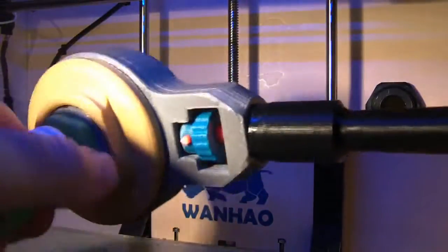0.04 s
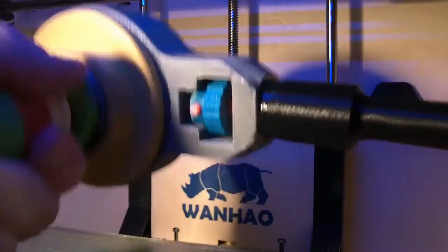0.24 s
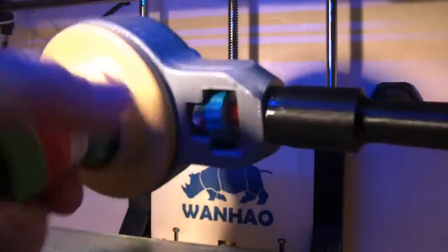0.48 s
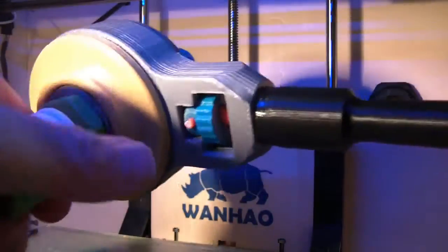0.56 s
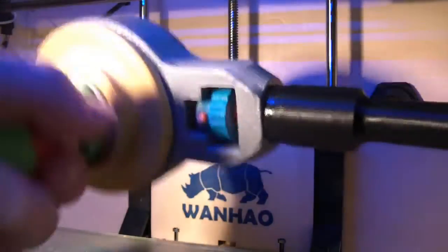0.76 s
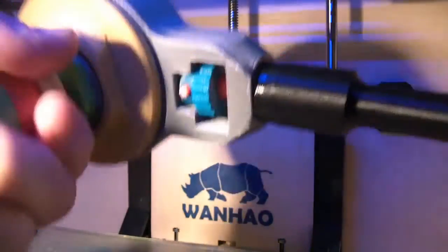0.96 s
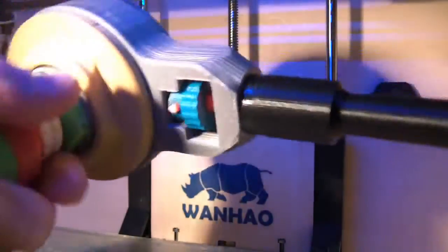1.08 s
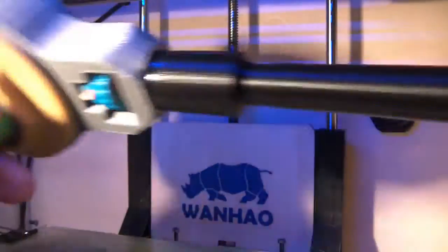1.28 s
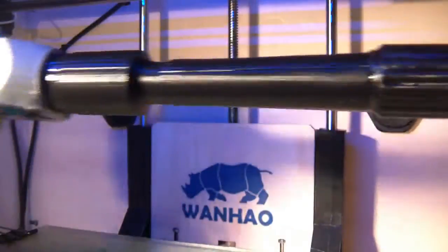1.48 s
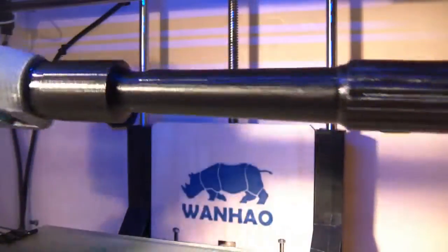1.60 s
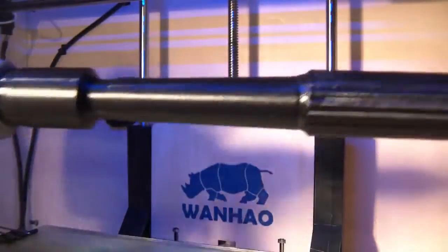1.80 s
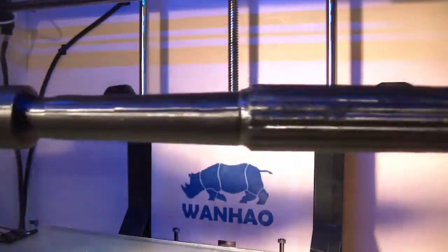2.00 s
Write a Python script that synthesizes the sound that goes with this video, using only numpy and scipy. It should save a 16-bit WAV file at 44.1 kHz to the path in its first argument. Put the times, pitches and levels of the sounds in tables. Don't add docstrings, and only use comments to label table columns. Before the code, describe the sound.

A plastic ratchet wrench clacks loudly in two short bursts over steady whining fan hum

```python
import sys
import numpy as np
from scipy import signal
from scipy.io import wavfile
from scipy.ndimage import uniform_filter1d

SR = 44100
rng = np.random.default_rng(int(sys.argv[2]) if len(sys.argv) > 2 else 0)


def unload_wav(signal):
    wavfile.write(
        sys.argv[1],
        SR,
        np.round(np.clip(np.atleast_2d(signal).T, -1, 1) * 32767).astype(np.int16),
    )


def convert_level_to_amplitude(level_db):
    exponent = np.asarray(level_db, float) / 20
    return 10 ** exponent


N = 90404


def evened(x):
    return x / np.sqrt(np.mean(x ** 2) + 1e-20)


def read(points, hz):
    f, value = np.transpose(points)
    return np.interp(np.log(hz + 1), np.log(f + 1), value)


# (frequency [Hz], level [dB])
AIR_COLOUR = [(20, -18), (120, -17.5), (190, -20.5), (500, -9.5), (1200, -15.5), (5000, -12.5),
              (8000, -27.5), (14000, -27)]
# (frequency [Hz], width [Hz], level [dB])
BOX_RESONANCES = [(310, 20, 7.5), (787, 33, -2), (2200, 97, -5.5), (2930, 760, 2.5), (4170, 200, 5),
                  (12400, 320, -12.5), (15200, 1100, -25)]
# (frequency [Hz], likeness [0 to 1])
LIKENESS = [(40, 0.69), (180, 0.73), (550, 0.89), (1650, 1), (4970, 0.69), (15000, 0.1)]
# (frequency [Hz], left minus right [dB])
LEAN_LEFT = [(60, 1), (240, -1), (950, -1), (3770, -1.5), (15000, -1)]


def air():
    level_db, patch_db = -31, 0.86
    frames, hz = N // 256 + 5, np.fft.rfftfreq(1024, 1 / SR)
    a, b, c, d, patches = rng.standard_normal((frames, 513, 5)).T
    patches = uniform_filter1d(patches, size=10, axis=0)
    patches = evened(uniform_filter1d(patches, size=10, axis=1))
    bumps = sum(db * np.exp(-((hz - f) / width) ** 2) for f, width, db in BOX_RESONANCES)
    colour = read(AIR_COLOUR, hz) + bumps
    same = np.clip(read(LIKENESS, hz), -1, 1)[:, None]
    left = a + 1j * b
    right = same * left + np.sqrt(1 - same ** 2) * (c + 1j * d)
    lean = read(LEAN_LEFT, hz) * np.array([[.5], [-.5]])
    spectrum = np.array([left, right]) * convert_level_to_amplitude((colour + lean)[:, :, None] + patch_db * patches)
    hiss = signal.istft(spectrum, nperseg=1024, noverlap=768)[1][:, :N]
    return convert_level_to_amplitude(level_db) * evened(hiss)


def drift(top_hz):
    t = np.arange(N) / SR
    waves = (np.sin(2 * np.pi * (f * t + rng.random())) / np.sqrt(f)
             for f in np.geomspace(.3, top_hz, num=12))
    return evened(sum(waves))


# (multiple of the blade rate, level [dB])
BLADE_TONES = [(1, -42.5), (2, -39), (3, -37), (4, -39), (5, -43.5), (7, -54), (20, -50.5), (21, -46.5),
               (22, -50), (23, -49), (24, -58), (28, -48), (30, -51), (36, -48.5), (42, -53.5)]
# (multiple of the shaft rate, level [dB])
SHAFT_TONES = [(13, -52.5), (20, -52), (27, -49.5)]
# (frequency [Hz], level [dB])
WHINE_TONES = [(906.2, -34.5), (1812.4, -51)]


def fans():
    blade_hz, blade_count = 136.18, 7
    speed_waver, waver_db, side_db = 0.001294, 0.58, -35
    first = np.cumsum(1 + speed_waver * drift(6.12)) / SR
    second = np.cumsum(1 + speed_waver * drift(6.4)) / SR
    tones = [(k * blade_hz, db, first) for k, db in BLADE_TONES]
    tones += [(m / blade_count * blade_hz, db, first) for m, db in SHAFT_TONES]
    tones += [(hz, db, second) for hz, db in WHINE_TONES]
    out = np.zeros((2, N))
    for hz, db, clock in tones:
        phase = 2 * np.pi * (hz * clock + rng.random())
        side = convert_level_to_amplitude(side_db) * np.cos(phase) * rng.choice([-1, 1])
        loudness = np.sqrt(2) * convert_level_to_amplitude(db + waver_db * drift(30))
        out += loudness * (np.sin(phase) + side * np.array([[1], [-1]]))
    return out


# (frequency [Hz], level [dB])
HEAD_LEVEL = [(700, -18), (1200, -10.5), (1600, 2), (2500, -1.25), (3300, -0.5), (5200, -5), (7500, -8.5),
              (14000, -20)]
# (frequency [Hz], time to fall 60 dB [s])
HEAD_DECAY = [(1200, 0.018), (3000, 0.019), (6000, 0.012), (12000, 0.0041)]


def pawl(force_db, chatter_s, ring_hz, bright_db, rise, modes_hz):
    bounces_per_s, fade_db, first_db, grain_db = 3500, -9, 2, 3
    stop_share = 0.3
    detune, scatter_db = .02, 2
    favour_db, favour_t60 = -8, 0.016
    thud_db, thud_hz = -60, 302
    chance, size, sign, spot = rng.random((2048, 4)).T
    loud, tune = rng.standard_normal((2, 4, len(modes_hz), 1))
    t = np.arange(2048) / SR
    u = t / chatter_s
    blows = (chance < bounces_per_s / SR) * convert_level_to_amplitude(-grain_db * np.log(size + 0.00087)) * (sign - .5)
    blows[0] = convert_level_to_amplitude(first_db)
    blows *= convert_level_to_amplitude(fade_db * u)
    blows *= np.clip((1.15 - u) / stop_share, 0, 1) * np.clip((u + 0.022) / rise, 0, 1)
    t = t[:700]
    hz = modes_hz[:, None] * (1 + detune * tune)
    level = read(HEAD_LEVEL, hz) + bright_db * np.log2(hz / 2000) + scatter_db * loud
    fading = convert_level_to_amplitude(level - 60 * t / read(HEAD_DECAY, hz))
    ring = (fading * np.sin(2 * np.pi * hz * t + 9 * tune)).sum(1)
    clear = convert_level_to_amplitude(-60 * t / favour_t60) * np.sin(2 * np.pi * ring_hz * t)
    strike = evened(ring) + convert_level_to_amplitude(favour_db) * evened(clear)
    spots = blows * ((spot * len(ring)).astype(int) == np.arange(len(ring))[:, None])
    body = signal.fftconvolve(spots, strike, axes=1).sum(0)
    thud = signal.sosfilt(signal.butter(1, thud_hz, fs=SR, output="sos"), blows)
    thud = np.pad(thud, (0, len(t) - 1))
    loudest = np.sqrt(uniform_filter1d(body ** 2, size=128).max())
    return convert_level_to_amplitude(force_db) * (0.37 * body / loudest + convert_level_to_amplitude(thud_db) * thud / np.abs(thud).max())


# (time [s], force [dB], chatter [s], favoured ring [Hz], brightness [dB per octave])
SMALL_KNOCKS = [(0.1157, -16, 0.0016, 1720, -8), (0.2353, 0.5, .012, 1730, -3.5),
                (0.2485, -7, 0.0032, 3070, -6), (0.282, 0, 0.0036, 1770, 5.5), (0.299, -6, 0.0027, 2970, 2),
                (0.314, -7, .003, 1740, -7), (.354, -8, 0.0047, 2200, 3), (.417, -8.5, 0.0015, 1570, -1.5),
                (.429, -29, 0.0026, 3020, -4), (.482, -12.5, .002, 4130, -6.5),
                (.831, -2, 0.0094, 1730, -6), (.8365, 0.5, 0.014, 1750, -3.5),
                (.876, 1.5, 0.014, 2290, -7.5), (.919, -0.5, 0.0045, 1780, 2),
                (0.9554, -0.5, 0.012, 1770, -6.5), (1.004, -2.5, .008, 5800, 4),
                (1.017, -18.5, .012, 1550, 3), (1.04, -12.5, 0.035, 5030, 0)]
# (time [s], force [dB], chatter [s], favoured ring [Hz], brightness [dB per octave])
PAWL_SNAPS = [
    (0.2539, 16.5, 0.024, 5340, 4.4),
    (0.3229, 16.5, 0.0191, 5320, 2),
    (0.3886, 15, .014, 2493, 3),
    (0.8538, 20.5, 0.016, 2454, 6),
    (0.8978, 16, 0.022, 2390, 4.5),
    (0.9792, 14.5, .021, 4710, 3.5),
]


def wrench():
    out = np.zeros(N)
    modes_hz = np.linspace(np.sqrt(600), np.sqrt(15000), num=70) ** 2
    for knocks, rise in [(SMALL_KNOCKS, 0.23), (PAWL_SNAPS, .03)]:
        for start, *how in knocks:
            sound = pawl(*how, rise, modes_hz)
            part = out[round(start * SR):][:len(sound)]
            part += sound[:len(part)]
    return out


def tail(seconds, decay):
    noise = rng.standard_normal((2, round(seconds * SR)))
    hz, t, z = signal.stft(noise, SR, nperseg=128)
    out = signal.istft(z * convert_level_to_amplitude(-60 * t / decay(hz)[:, None]), SR, nperseg=128)[1]
    return out / np.linalg.norm(out[0])


# (frequency [Hz], time to fall 60 dB [s])
ROOM_DECAY = [(500, 0.1), (1300, 0.21), (3500, .19), (9000, 0.16)]


def space(x):
    room_db, scatter_db, scatter_s = -12, 0.5, 0.0033
    t = np.arange(512) / SR
    close = np.diff(rng.standard_normal(513)) * convert_level_to_amplitude(-60 * t / scatter_s)
    close = convert_level_to_amplitude(scatter_db) / np.linalg.norm(close) * close * np.array([[1], [-1]])
    room = tail(.4, lambda hz: read(ROOM_DECAY, hz))
    room = convert_level_to_amplitude(room_db) * (room + 0.44 * room[::-1])
    scattered = signal.fftconvolve(x[None], close, axes=1)[:, :N]
    echoes = signal.fftconvolve(x[None], room, axes=1)[:, :N]
    return x + scattered + echoes


def scene():
    return air() + fans() + space(wrench())


def top_cut(x):
    return signal.sosfilt(signal.butter(12, 15600, fs=SR, output="sos"), x)


def record(dry):
    duck_db, duck_share, recover_db_s = -9, 0.23, 150
    ceiling, knee, mic_top_hz = 0.89, 9.3, 15200
    power = uniform_filter1d((dry ** 2).mean(0), size=200)
    power_db = 10 * np.log10(abs(power) + 1e-12)
    fall = np.arange(N) * recover_db_s / SR
    held_db = np.maximum.accumulate(power_db + fall) - fall
    over_db = np.maximum(held_db - duck_db, 0)
    x = dry / convert_level_to_amplitude(duck_share * uniform_filter1d(over_db, size=100)) / ceiling
    x = ceiling * x / (1 + np.abs(x) ** knee) ** (1 / knee)
    x = signal.sosfiltfilt(signal.butter(4, mic_top_hz, fs=SR, output="sos"), x)
    return top_cut(x)


dry = scene()
out = record(dry)
unload_wav(out)
```